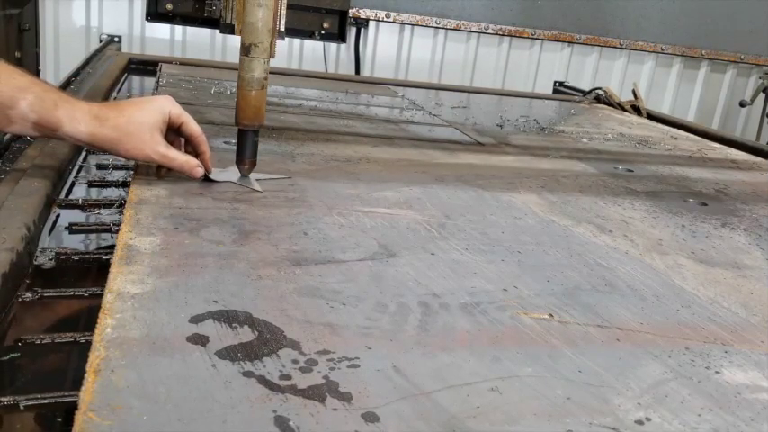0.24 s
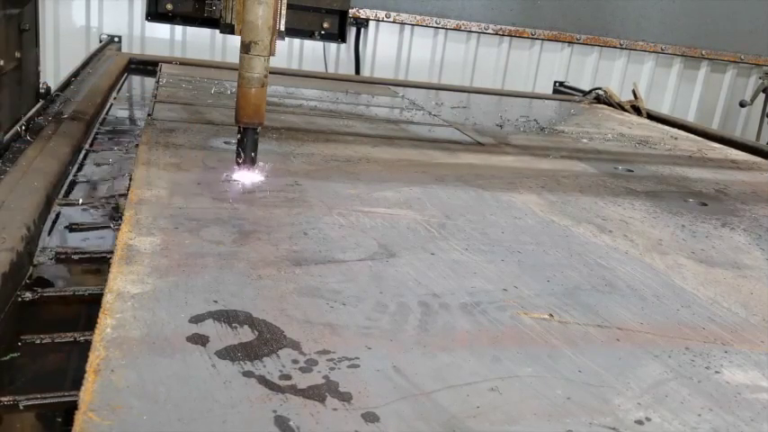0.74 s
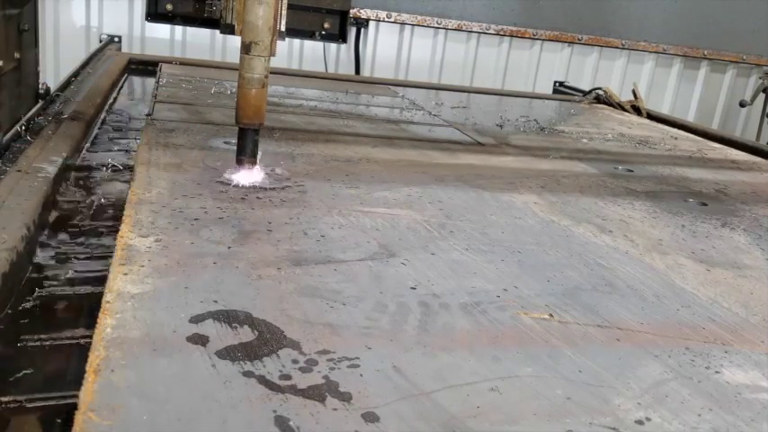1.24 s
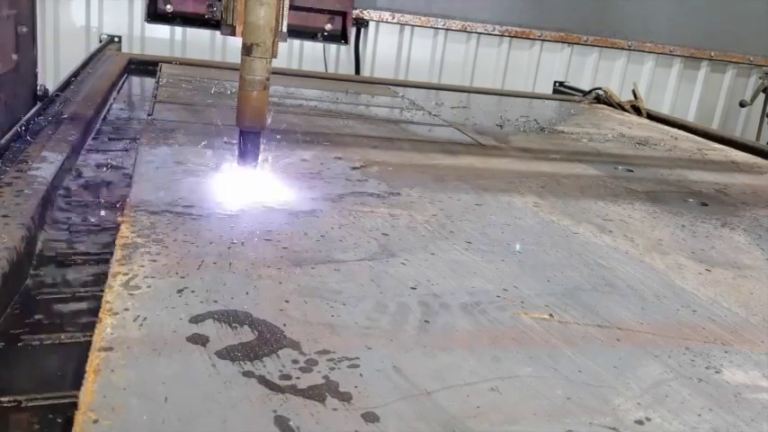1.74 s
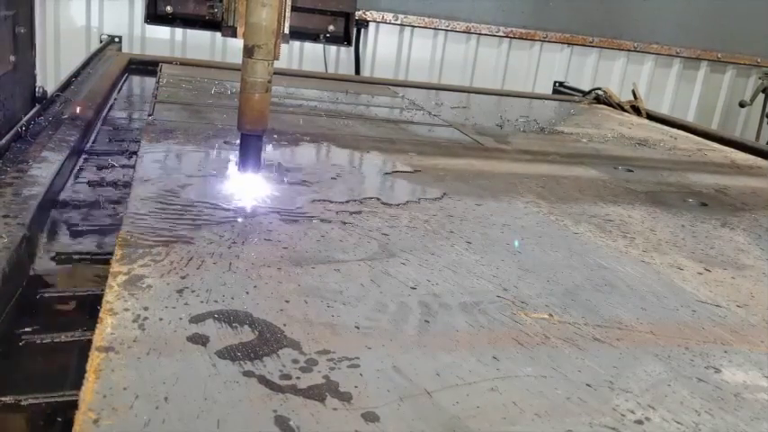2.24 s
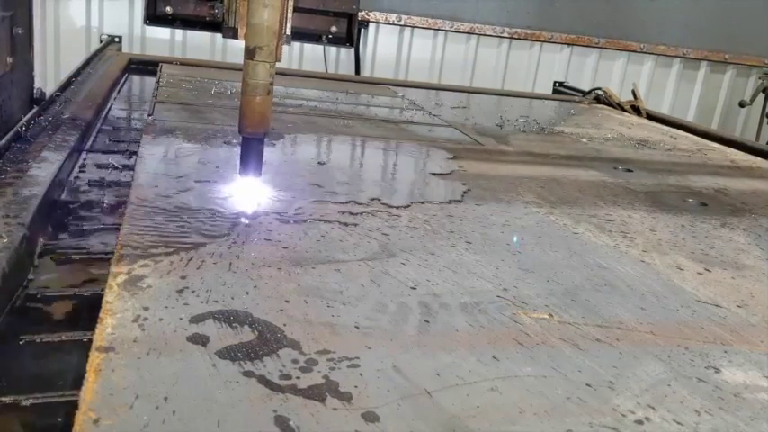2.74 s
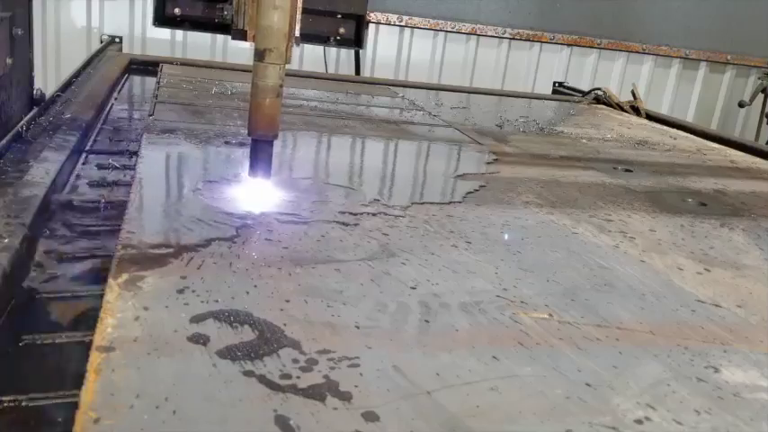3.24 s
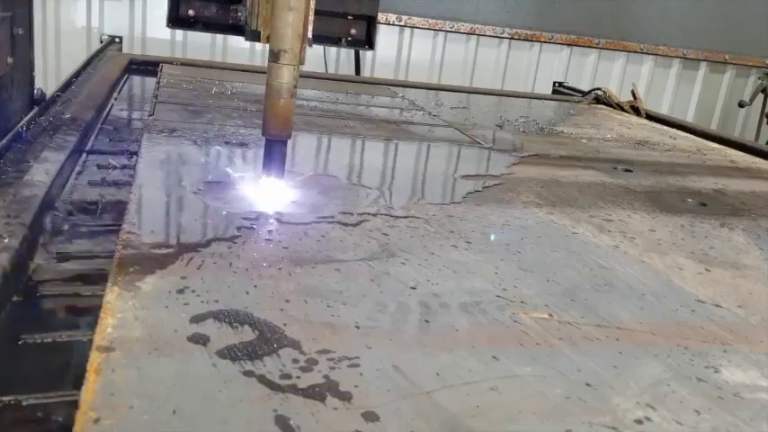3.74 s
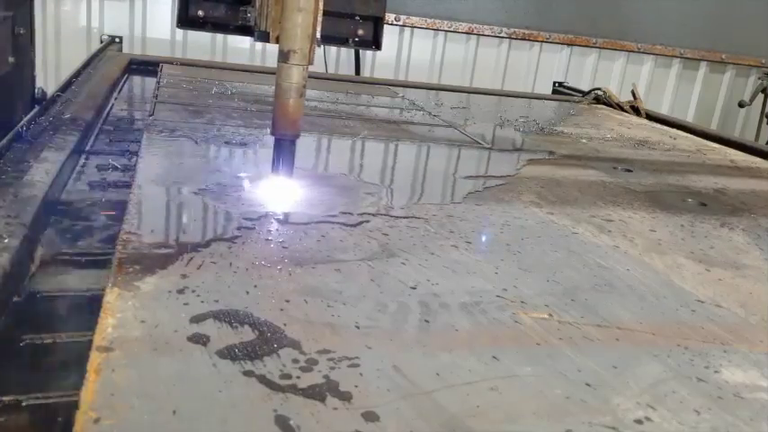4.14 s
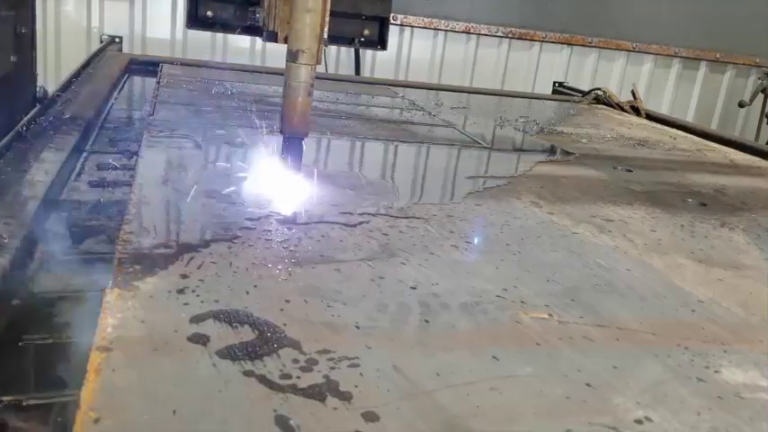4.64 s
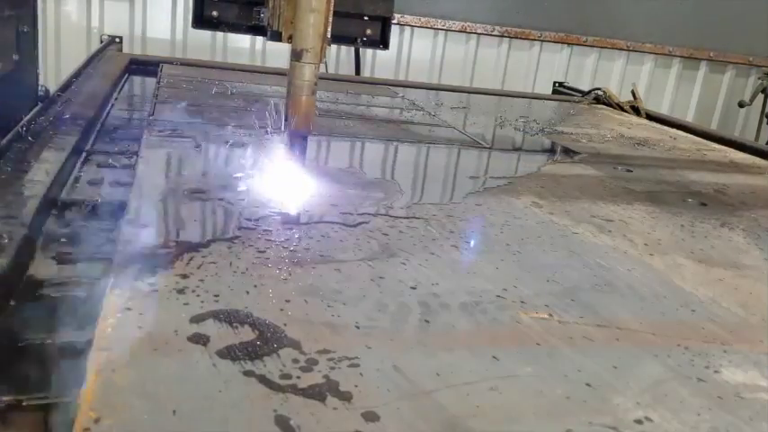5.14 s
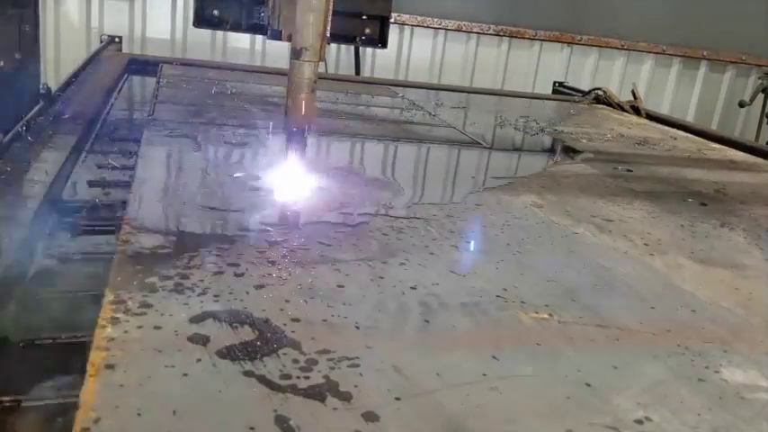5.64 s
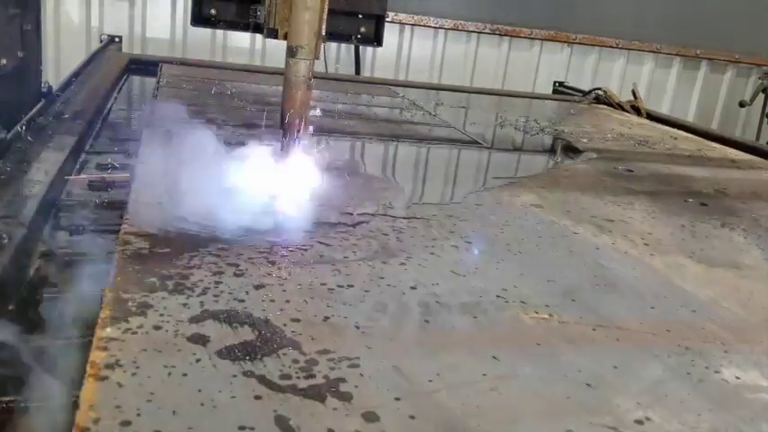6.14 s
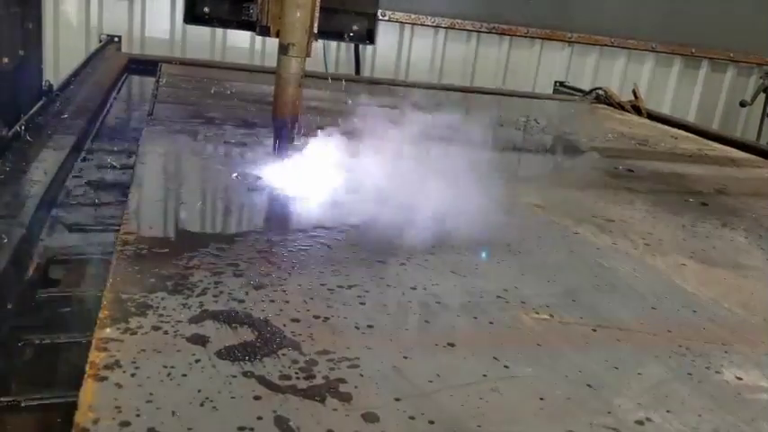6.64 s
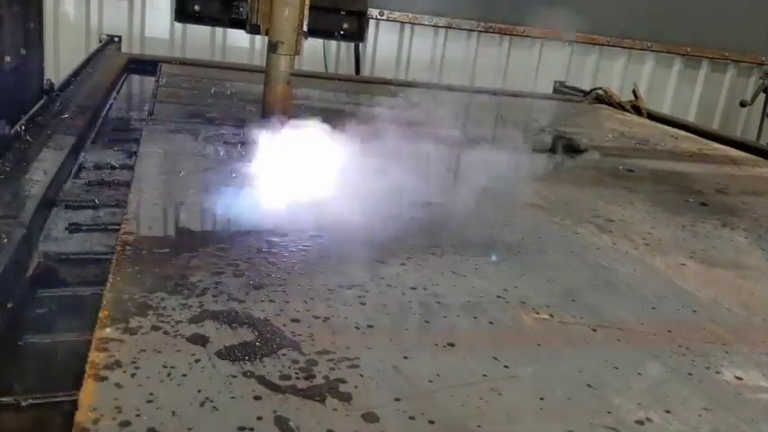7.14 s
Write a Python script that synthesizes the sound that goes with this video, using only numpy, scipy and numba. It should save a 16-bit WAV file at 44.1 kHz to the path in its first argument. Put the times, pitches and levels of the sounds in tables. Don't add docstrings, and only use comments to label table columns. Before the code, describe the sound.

A thin steel shim scrapes and rings off plate, then a plasma torch snaps alight and roars, hissing on over bursting, gurgling water.

```python
import sys
import numpy as np
from scipy import signal
from scipy.fft import rfft, irfft, next_fast_len
from scipy.io import wavfile
from scipy.ndimage import uniform_filter1d, map_coordinates
from numba import njit

SR = 44100
rng = np.random.default_rng(int(sys.argv[2]) if len(sys.argv) > 2 else 0)


def elevation(decibels):
    levels = np.asarray(decibels, float)
    return 10 ** (levels / 20)


def wav_record(signal):
    frames = np.transpose(np.atleast_2d(signal))
    bounded = np.clip(frames, -1, 1)
    quanta = np.round(bounded * 32767).astype(np.int16)
    wavfile.write(sys.argv[1], SR, quanta)


N = 325899
TIME = np.arange(N) / SR
THUD_S, STRIKE_S, THROUGH_S = .285, .510, 1.95

# (time [s], hiss level [dB], blowback [0-1, share of gas thrown back up out of the cut])
JET_COURSE = [(.37, -66, .6), (.41, -47, .6), (.46, -31, .6), (.481, -34, .2), (.485, -29, 0.2),
              (.509, -30, .2), (.511, -25, 0.3), (.55, -21.5, 0.51), (.82, -19.5, 0.38), (1.2, -23.5, 0.47),
              (1.45, -20, 0.3), (1.9, -21.5, 0.45), (2.04, -20, 0.17), (2.3, -21.5, 0.45),
              (3.05, -19.5, 0.33), (4.0, -19.5, 0.49), (4.9, -21, 0.59), (5.7, -18.5, 0.59),
              (6.45, -21.5, 0.86), (6.7, -19, 0.68), (7.39, -20, 0.53)]
# (time [s], level [dB])
STEADY_BOIL = [
    (.5, -53.5),
    (.8, -47.5),
    (1.1, -51.5),
    (1.9, -49),
    (2.3, -47),
    (3.3, -43.5),
    (4.0, -47.5),
    (4.9, -48),
    (5.6, -46),
    (7.39, -47),
]
# (time [s], travel [0-1])
TORCH_TRAVEL = [
    (0, 0.3),
    (.44, .01),
    (1.9, 0.03),
    (3.2, 0.2),
    (3.7, .27),
    (4.3, 0.55),
    (4.8, 0.8),
    (5.7, 0.9),
    (6.6, 1.0),
    (7.39, 1.0),
]


def curves(table, at=TIME):
    s, *columns = np.transpose(table)
    return [np.interp(at, s, c) for c in columns]


def ramp(start, length, at=TIME):
    return np.clip((at - start) / length, 0, 1)


def unit(x):
    return x / np.sqrt(np.mean(x ** 2))


def colour(x, table):
    hz, db = np.transpose(table)
    size = next_fast_len(x.shape[-1])
    f = np.maximum(np.fft.rfftfreq(size, 1 / SR), 1)
    gain = elevation(np.interp(np.log(f), np.log(hz), db, -90, -90))
    return unit(irfft(rfft(x, size) * gain, size)[..., :x.shape[-1]])


def walk(rate):
    k = max(int(SR / rate), 1)
    held = np.repeat(rng.standard_normal(N // k + 1), k)
    return unit(uniform_filter1d(uniform_filter1d(held, k), k)[:N])


def flutter(rate):
    w = walk(rate)
    return unit(w - uniform_filter1d(w, size=SR // 3))


@njit
def svf(x, hz, width):
    y, b, l = np.empty(len(x)), 0., 0.
    for i in range(len(x)):
        g, k = np.tan(np.pi * hz[i] / SR), width / hz[i]
        v = (b + g * (x[i] - l)) / (1 + g * (g + k))
        b, l, y[i] = 2 * v - b, l + 2 * g * v, k * v
    return y


def sputter(rate, size_db, fade_s):
    sizes = np.minimum(rng.exponential(size=N), 2.5)
    kicks = (rng.random(N) < rate / SR) * elevation(size_db * sizes)
    return unit(1 + signal.lfilter([1], [1, -np.exp(-1 / (fade_s * SR))], kicks))


def jet():
    # (pitch [Hz], level [dB per Hz])
    hiss_colour = [(6500, -14.5), (7700, -17), (8300, -10), (9400, -8.5), (10000, -7), (10900, -1.5),
                   (11800, -4.5), (12600, -5.5), (13600, -3.5), (15000, -5), (15600, -2), (16500, -56)]
    shield_colour = [(4300, -8), (5300, -0.5), (5800, -0.5), (6500, -1.5), (7000, -3), (7600, -8.5),
                     (8500, -3)]
    pierce_colour = [(1500, -23), (2400, -3.5), (3100, 5), (3500, -0.5), (3950, 3.5), (4500, 0), (5000, 2),
                     (5600, -42)]
    kerf_colour = [(1800, -33), (2600, -5), (3400, -2.5), (3900, 0.5), (4300, 3.5), (4900, 1), (5300, -5),
                   (6000, -19)]
    # (time [s], pitch [Hz], level over the roar [dB])
    hole_whistle = [
        (.5, 4670, -9),
        (.6, 4400, 2.5),
        (.8, 3770, 3.5),
        (1.1, 3570, -5.5),
        (1.4, 3900, -34),
        (1.7, 3270, -13),
        (1.95, 3420, -6),
    ]
    hiss_db, blowback = curves(JET_COURSE)
    arc = unit(sputter(rate=110, size_db=-10.0, fade_s=0.0034) * elevation(0.034 * walk(40) + .5 * walk(430)))

    def gas(table, own_db):
        return colour(rng.standard_normal(N) * arc, table) * elevation(own_db * flutter(13))

    through, lit = ramp(THROUGH_S, 0.01), ramp(STRIKE_S, .03)
    hole_hz, hole_db = curves(hole_whistle)
    whistle = svf(svf(rng.standard_normal(N) * arc, hole_hz, 1300.0), hole_hz, 2000.0)
    blind = elevation(3.5) * (gas(pierce_colour, 0.59) + elevation(hole_db) * unit(whistle))
    opened = (0.45 + 0.39 * ramp(THROUGH_S, 0.084)) * gas(kerf_colour, 0.3)
    roar = (1 - through) * blind + through * opened
    gasp_db, gasp_s = -2, 0.016
    surge = 0.5 * flutter(12) + gasp_db * np.exp(-((TIME - THROUGH_S - gasp_s) / gasp_s) ** 2)
    cold = elevation(-47 + 4 * ramp(.475, .02)) * ramp(.385, .06) * (1 - lit)

    def region(base_db, blowback_db, feel, cold_db):
        return cold * elevation(cold_db) + lit * elevation(hiss_db + base_db + blowback_db * blowback + feel * surge)

    catch_s = .004
    catch = 1 - .6 * ramp(STRIKE_S - 2.5 * catch_s, catch_s) * (TIME < STRIKE_S)
    hiss = catch * elevation(hiss_db + surge) * (TIME > JET_COURSE[0][0]) * gas(hiss_colour, 0.19)
    shield = region(-18, 15.5, 0.93, -6) * gas(shield_colour, 0.28)
    return hiss + shield + region(-18.5, 16, 0.82, 0) * roar


def boiling():
    # (time [s], peak [dB], small bubbles minus peak [dB], length [s])
    steam_bursts = [(1.757, -30, -12, 0.1), (1.816, -23.5, -5.5, 0.041), (1.99, -26.5, -6, 0.059),
                    (2.245, -25, -28, 0.035), (2.392, -27.5, -13, 0.1), (2.553, -33.5, -1, 0.044),
                    (2.704, -29, -6.5, 0.067), (2.853, -26.5, -9.5, 0.11), (2.972, -23.5, -9, 0.031),
                    (3.29, -17.5, -10, 0.02), (3.392, -23, -32, 0.022), (3.44, -26, -20, 0.031),
                    (3.617, -31, -12, 0.031), (3.92, -31, -8, 0.077), (4.03, -34, -8.5, 0.093),
                    (4.23, -33, -8.5, 0.1), (4.41, -36, -3.5, 0.06), (4.492, -32, -3.5, 0.041),
                    (5.258, -24, -14, 0.054), (5.402, -20, -18, 0.024), (5.523, -26.5, -10, 0.12),
                    (5.765, -25, -6.5, 0.066), (5.87, -27, -10, 0.17), (6.133, -21, -2, 0.039),
                    (6.201, -17.5, -6.5, 0.046), (6.497, -17, -13.5, 0.042), (6.655, -20.5, -11.5, 0.04),
                    (6.736, -26, -3, 0.031), (6.84, -16, -14.5, 0.11), (7.081, -21, -12.5, 0.051),
                    (7.178, -22.5, -9, 0.11)]
    hiss_db, blowback = curves(JET_COURSE)
    boil_db = curves(STEADY_BOIL)[0] + 0.34 * flutter(9.9)
    blind = 1 - ramp(THROUGH_S + 0.24, 0.21)
    deep = elevation(boil_db + 1.46 * flutter(17)) ** 2
    small = elevation(boil_db - 6.5 + 7 * blowback + 6.5 * blind + 0.35 * flutter(11)) ** 2
    wash = elevation(hiss_db - 31 + 9.5 * blowback + 8.0 * blind + 1.67 * flutter(11)) ** 2
    for s, db, small_db, length in steam_bursts:
        i = int(s * SR)
        u = TIME[:min(SR // 2, N - i)]
        burst = elevation(db - 10.5) ** 2 * np.minimum(u / .014, 1) * np.exp(-(u / max(length, .01)) ** 2)
        deep[i:i + len(u)] += burst * elevation(-0.53 * (small_db + 15.5) - 0.69 * (db + 35.5)) ** 2
        small[i:i + len(u)] += burst * elevation(small_db + 7) ** 2
        wash[i:i + len(u)] += burst * elevation(-3.5 - 0.29 * (db + 29.5)) ** 2
    return np.sqrt([deep, small, wash]) * ramp(STRIKE_S, 0.011)


def bubbles(centre_hz, spread, width_hz, rate, size_db, count=4):
    out, centre = 0, centre_hz * (1 - 0.17 * curves(TORCH_TRAVEL)[0])
    for _ in range(count):
        knocks = (rng.random(N) < rate / count / SR) * elevation(size_db * rng.exponential(size=N))
        knocks = knocks * rng.standard_normal(N)
        hz = centre * np.exp(spread * walk(25))
        out = out + svf(svf(knocks, hz, width_hz), hz, 2.33 * width_hz)
    return unit(out)


def pool(deep_gain, small_gain, wash_gain):
    # (pitch [Hz], level [dB per Hz])
    wash_colour = [(700, -5), (1000, -5.5), (1300, -2), (1700, -2), (2200, 1.5), (2700, -3)]
    gulps = bubbles(centre_hz=339.0, spread=0.15, width_hz=91.0, rate=900, size_db=1.5)
    small = bubbles(centre_hz=720, spread=0.15, width_hz=178.0, rate=1500, size_db=2.0)
    wash = colour(rng.standard_normal(N) * sputter(rate=85, size_db=2.0, fade_s=0.0027), wash_colour)
    return deep_gain * gulps + small_gain * small + wash_gain * wash


def strike():
    # (time [s], pitch [Hz], level [dB])
    crater_hollow = [
        (.53, 2300, -34),
        (.555, 1490, -35),
        (.58, 1010, -32),
        (.61, 765, -31),
        (.63, 710, -30),
        (.66, 640, -48),
    ]
    # (time [s], peak [dB], push length [s], spit [dB])
    arc_cracks = [(.095, -50, .0003, -46), (.415, -37, .0004, -29), (.4835, -50, .0003, -28),
                  (.490, -33, .0003, -36), (.492, -50, .0003, -27), (.4995, -50, .0003, -29),
                  (.5102, -22, .0008, -22), (.5135, -50, .0003, -16), (.5425, -50, .0003, -21),
                  (.5475, -50, .0003, -20), (2.992, -28, .0006, -34)]
    hz, db = curves(crater_hollow)
    out = elevation(db) * unit(svf(rng.standard_normal(N), hz, 130.0))
    out *= (TIME > crater_hollow[0][0]) * (TIME < crater_hollow[-1][0])
    u = TIME[:SR // 10]
    for s, db, push, spit_db in arc_cracks:
        i = int(s * SR)
        out[i:i + len(u)] += elevation(db) * 3 * u / push * np.exp(-u / push) * np.cos(0.74 * u / push)
        spit = np.diff(rng.standard_normal(len(u) + 1))
        out[i:i + len(u)] += elevation(spit_db) * np.exp(-u / 0.003) * spit
    return out


def shim():
    # (time [s], scrape level [dB])
    drag = [
        (0.095, -39),
        (.121, -33),
        (0.133, -28),
        (0.201, -36),
        (0.223, -31),
        (0.291, -37.5),
        (0.321, -70),
        (0.425, -43.5),
        (0.52, -50),
    ]
    # (pitch [Hz], width [Hz], level [dB])
    shim_modes = [(408, 15, -4), (588, 29, -1), (820, 26, -4), (1068, 26, 1), (1236, 38, 0.5),
                  (1700, 44, -5), (1867, 27, 5), (2200, 51, -5), (2520, 40, -3), (2460, 25, -2),
                  (2900, 54, -10), (4340, 54, -23), (5330, 130, -12)]
    t = TIME[:SR]
    scrape_db = curves(drag, t)[0]
    slips = rng.standard_normal(SR) * elevation(5.3 * walk(300)[:SR])
    modes = 0
    for hz, width, db in shim_modes:
        modes = modes + elevation(db) * unit(svf(slips, np.full(SR, 1. * hz), 0.5 * width))
    rasp = colour(slips, [(250, -21), (500, -3.0), (3000, 1), (4000, -19)])
    body = unit(unit(modes) + elevation(-5) * rasp)
    thud = unit(svf(rng.standard_normal(SR), np.full(SR, 170.), 49.0))
    u = t - THUD_S
    thud *= elevation(-50) + elevation(-46) * np.exp(-abs(u) / np.where(u < 0, 0.015, 0.08))
    grit = colour(slips, [(3000, 11), (4500, 0.0), (7000, -22), (15500, 2)]) * elevation(scrape_db - 26)
    soft_hiss = colour(rng.standard_normal(SR), [(2000, 0), (4500, 10.0), (7500, -10), (11000, -1), (15700, 2)])
    grit += elevation(-48.5 - 60 * (t - drag[0][0])) * soft_hiss
    moving = (t > drag[0][0]) * (t < drag[-1][0])
    return np.pad((elevation(scrape_db - 4.5) * body + thud + grit) * moving, (0, N - SR))


def rings():
    # (time [s], peak [dB], pitch [Hz], length [s], glide [Hz per s])
    shim_rings = [(.105, -33, 1110, .008, 3000), (.13, -30, 430, .006, 0), (.138, -31, 428, .014, 300),
                  (.135, -25, 2060, .005, 500), (.15, -33, 450, .008, 0), (.146, -38, 1100, .008, 0),
                  (.165, -38, 2530, .008, 0), (.17, -35, 480, .008, 0), (.19, -39, 430, .02, 0),
                  (.213, -37, 1130, .005, 0), (.218, -32, 1880, .012, 500), (.219, -25, 4340, .005, 0),
                  (.222, -37, 2540, .012, -500), (.228, -37, 1100, .008, 0), (.24, -37, 1900, .02, 0),
                  (.243, -35, 2430, .01, -15000), (.2545, -25, 2090, .006, -9000),
                  (.272, -39, 2000, .006, 0), (.28, -32, 440, .014, -1500), (.288, -33, 1076, .01, 0),
                  (.29, -38, 1300, .01, 0), (.3, -35, 300, .02, -4000), (.325, -41, 1100, .012, 0),
                  (.4, -41, 800, .012, -500), (.4165, -32, 760, .009, -4000), (.43, -39, 690, .008, -3000)]
    out, chatter = np.zeros(N), elevation(2.0 * walk(153.5))[:SR]
    wander_rad = .6 * walk(141.0)[:SR]
    for s, db, hz, length, glide in shim_rings:
        u = TIME[:SR] - s
        swell = np.exp(-(u / length / np.where(u < 0, .5, 1)) ** 2)
        out[:SR] += elevation(db) * chatter * swell * np.sin(2 * np.pi * (hz + glide * u / 2) * u + wander_rad)
    return out


def rumble(deep_gain):
    # (pitch [Hz], level [dB per Hz])
    tank_colour = [(15, -49), (25, -15), (64, -39), (97, -6.5), (135, -12.5), (220, -1.5), (290, -44),
                   (480, -120)]
    # (time [s], peak [dB])
    tank_jolts = [(.3, -47), (0.511, -49), (1.764, -71), (2.781, -61), (2.985, -50), (3.145, -50),
                  (3.292, -69), (3.596, -55), (4.209, -66), (4.964, -58), (5.127, -59), (5.577, -54),
                  (5.882, -61), (6.038, -61), (6.354, -52), (6.947, -54), (7.28, -52)]
    shake = elevation(-59 + 1.4 * flutter(9) + 0.79 * (curves(STEADY_BOIL)[0] + 45.0))
    shake *= (deep_gain * elevation(40.0) + 0.031) ** 0.36 * colour(rng.standard_normal(N), tank_colour)
    shudder_db = 19.5 * np.exp(-(TIME - THUD_S) / 0.74)
    shake *= elevation(shudder_db + 1 - ramp(THROUGH_S, 0.36))
    blows = np.zeros(N)
    s, db = np.transpose(tank_jolts)
    blows[(s * SR).astype(int)] = elevation(db)
    u = np.arange(int(.08 * SR)) / SR / 0.0047
    jolt = 3.4 * u * np.exp(-u) * np.cos(2.0 * u)
    return shake * ramp(THUD_S - .02, .03) + signal.fftconvolve(blows, jolt)[:N]


def shop_hum():
    # (pitch [Hz], level [dB per Hz])
    hum_colour = [(25, -22), (45, -8), (110, 0), (170, -14), (500, -24), (800, -20), (1600, -36),
                  (2100, -27), (2500, -37), (4400, -33), (5000, -40), (15500, -43)]
    hum = colour(0.27 * rng.standard_normal((2, N)) + rng.standard_normal(N), hum_colour)
    return hum * elevation(-63.5 - 12 * ramp(.5, 1.0))


def ports(x):
    # (pitch [Hz], likeness [0-1], left minus right [dB])
    port_match = [(150, 0.98, 0.3), (684, 0.7, 1), (1400, 0.4, 1.4), (2300, 0.6, -0.5), (3110, 0.74, 2),
                  (3785, 0.5, 3.5), (4180, 0.3, 4.5), (5280, 0.5, 1), (6730, 0.11, -1.7), (7500, 0.19, 3.5),
                  (7920, 0.02, 3), (8480, 0.5, 1), (9100, 0.5, -1), (11100, 0.65, -0.7), (11640, 0.2, 1.5),
                  (12140, 0.6, 1), (13500, 0.7, -4.5), (13550, 0.6, 0.5), (14700, .72, 2)]
    # (pitch [Hz], while the torch dwells [rad], at the end of its travel [rad])
    left_leads = [(100, .1, .1), (690, .75, .6), (1460, .85, .65), (2240, 1.6, 1.6), (2700, 2.2, 2.3),
                  (3200, 3.05, 3.0), (3650, 3.5, 2.2), (4000, 2.7, 1.7), (4560, 1.65, 1.2), (5340, .45, .2),
                  (6100, -.6, -1.7), (6900, -.5, -1.5), (7450, 0, -.15), (8440, -.2, -1.7),
                  (9250, .1, -.35), (10000, .6, -.5), (10770, 1.6, -.2), (11540, 2.6, .1),
                  (12100, 2.95, .7), (13250, 3.35, 1.9), (13870, 4.5, 2.6), (14640, 5.8, 3.0),
                  (15420, 6.2, 3.4)]
    # (time [s], pitch at which the ports hear the roar opposed [Hz], scatter of the roar [dB])
    spray_path = [(0, 3200, 8), (.41, 3180, -3), (.45, 3080, -15), (.64, 3150, -7.5), (.75, 3200, -1.5),
                  (1.35, 3110, -1), (1.52, 3130, -9.5), (1.66, 3140, -0.5), (1.91, 3170, 1),
                  (1.94, 3450, -10), (2.25, 3440, -9.5), (2.35, 3260, -3), (2.42, 3270, -8),
                  (2.8, 3280, -10.5), (2.92, 3170, -3.5), (3.05, 3350, -8.5), (3.3, 3090, -2),
                  (3.55, 3040, -7.5), (3.7, 3030, -5.5), (3.92, 3006, -8), (4.03, 3136, -5),
                  (4.12, 3100, -3), (4.21, 3100, -4.5), (4.5, 3090, -8.5), (4.6, 3150, -5.5),
                  (4.75, 3200, -6), (4.92, 3140, -4.5), (5.0, 3100, -2.5), (5.3, 3080, -0.5),
                  (5.8, 3180, -3), (5.95, 3390, -7), (6.08, 3300, -1.5), (6.2, 3240, -3), (6.36, 3250, 1),
                  (6.52, 3106, -4), (6.66, 3070, -0.5), (6.93, 3180, -3), (7.07, 3240, -7),
                  (7.13, 3170, -0.5), (7.18, 3300, -7.5), (7.23, 3220, 3), (7.3, 3220, -7)]
    # (time [s], scatter [dB])
    steam_haze = [(0, 2), (.42, 2), (.5, -3), (.9, -4), (1.0, -8), (1.45, -8), (1.55, -4), (1.7, -5),
                  (1.91, -6), (1.94, 0), (3.28, 0), (3.34, -8), (3.8, -7), (3.9, -3), (4.05, -10),
                  (4.5, -9), (5.1, -5.5), (5.4, -3), (6.15, -2.5), (6.42, 3), (6.7, -3), (7.1, -4),
                  (7.39, 0)]
    hz, s, direct = signal.stft(x, SR, nperseg=512)
    patches = uniform_filter1d(rng.standard_normal(direct.shape), size=14, axis=0)
    patches = uniform_filter1d(patches, size=6, axis=1)
    direct = direct * elevation(1.51 * unit(patches))
    shop_t60_s = 0.28
    keep = elevation(-120 * (s[1] - s[0]) / shop_t60_s)
    lingering = signal.lfilter([1 - keep], [1, -keep], abs(direct) ** 2)
    scatter = np.sqrt(lingering) * np.exp(2j * np.pi * rng.random((2, *direct.shape)))
    start, end = (c[:, None] for c in curves(left_leads, hz))
    like, left_db = (c[:, None] for c in curves(port_match, hz))
    (opposed_hz, low_db), high_db = curves(spray_path, s), curves(steam_haze, s)[0]
    high_db = np.where((hz[:, None] < 10200) & (s < 5.15), np.minimum(high_db, -3.5), high_db)
    shading = 1.3 + (3.03 - 1.3) * (1 - ramp(STRIKE_S, THROUGH_S - STRIKE_S, s))
    travel = curves(TORCH_TRAVEL, s)[0] + 0.062 * np.interp(s, TIME, 0.32 * walk(4) + 0.97 * walk(25))
    lead = start + (end - start) * travel
    slide = 1 + (3200 / opposed_hz - 1) * ramp(6000, -1500, hz)[:, None]
    where = [np.arange(len(hz))[:, None] * slide, np.arange(len(s)) + 0 * slide]
    lead = map_coordinates(lead, where, order=1)
    lead = lead - 0.1 * np.sin(2 * lead)
    like = np.clip(like, .05, .99)
    scatter_db = np.where(hz[:, None] < 6000, low_db, high_db)
    scatter_db = scatter_db - 1.3 * unit(patches[::-1]) - 1.3 * np.cos(lead) ** 2
    odds = (1 - like) / like * elevation(scatter_db) ** 2
    half = np.exp(.5j * lead) * elevation(left_db * shading / 2)
    pair = np.array([half, 1 / half]) * direct
    pair = pair + np.array([abs(half), 1 / abs(half)]) * np.sqrt(2 * odds) * scatter
    return signal.istft(pair / np.sqrt(1 + odds), SR, nperseg=512)[1][:, :N]


def scene():
    hum = shop_hum()
    close = rings() + strike()
    water = boiling()
    cut, slide, table = jet() + pool(*water), shim(), rumble(water[0])
    close = close + 0.29 * slide
    far = ports(cut + 0.69 * slide + 0.31 * table)
    return far + 0.76 * table + [elevation(-2.0) * close, elevation(-6.5) * np.roll(close, 4)] + hum


def matrix(x, under_db):
    late = 1024 - 288
    frame = dict(window="cosine", nperseg=2048, noverlap=1024)
    padded = np.pad([x[0] + x[1], x[0] - x[1]], [(0, 0), (late, 0)])
    both = signal.stft(padded / 2, **frame)[2]
    bins = np.arange(both.shape[1])
    number = np.where(bins < 320, 10 * np.log(bins + 20), bins / 22 + 45).astype(int)
    first, band = np.unique(number, True, True)[1:]
    power = np.add.reduceat(abs(both) ** 2, first, axis=1)[:, band]
    uneven = uniform_filter1d(rng.standard_normal((len(first), both.shape[2])), size=2)[band]
    limit_db = under_db + 2.4 * uneven
    kept = (power > power[::-1] * elevation(-2 * limit_db)) | (bins[:, None] < 110)
    kept |= (abs(both) ** 2).sum(axis=(0, 1)) < elevation(-50 + 20) ** 2
    kept |= abs((np.arange(both.shape[2]) * 1024 - late) / SR - STRIKE_S) < 1024 / SR
    mid, side = signal.istft(both * kept, **frame)[1][:, late:late + N]
    return np.array([mid + side, mid - side])


def band_limit(x):
    return signal.sosfilt(signal.butter(12, 16990, fs=SR, output="sos"), x)


def record(dry):
    rounded = np.tanh(2.1 * dry) / 2.0
    x = matrix(rounded, under_db=8.5)
    x = signal.sosfilt(signal.ellip(12, .2, 80, 15780, fs=SR, output="sos"), x)
    return band_limit(x)


dry = scene()
out = record(dry)
wav_record(out)
```